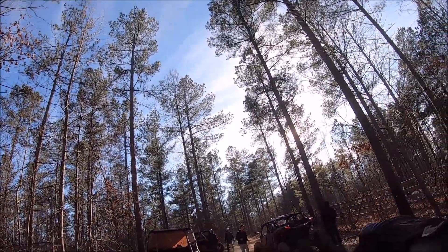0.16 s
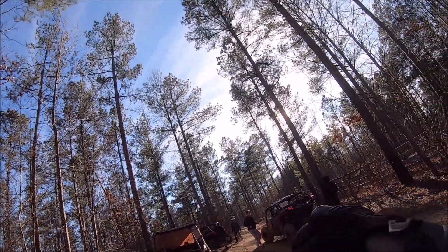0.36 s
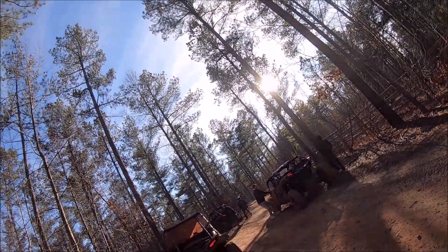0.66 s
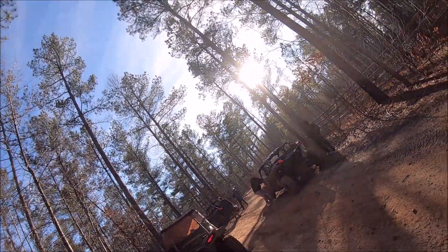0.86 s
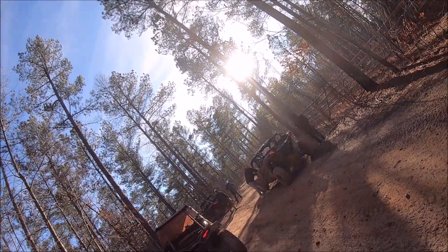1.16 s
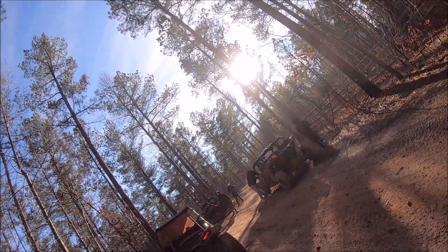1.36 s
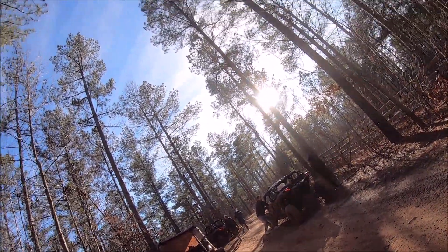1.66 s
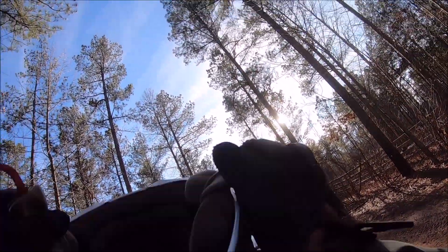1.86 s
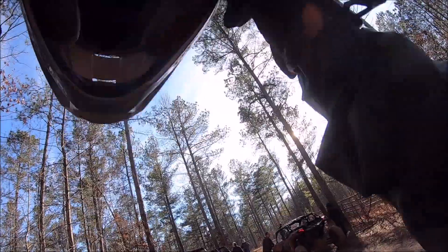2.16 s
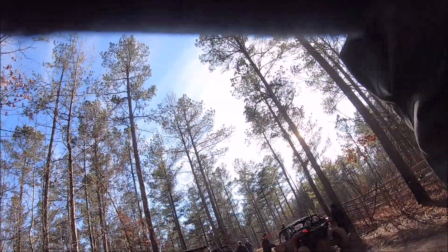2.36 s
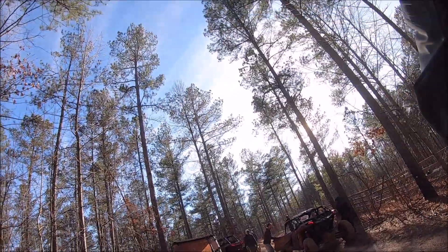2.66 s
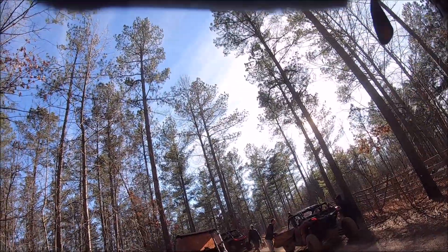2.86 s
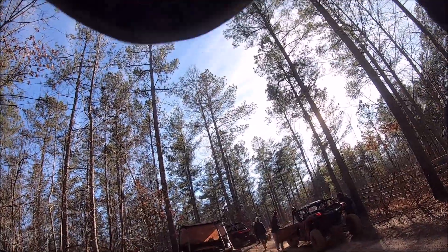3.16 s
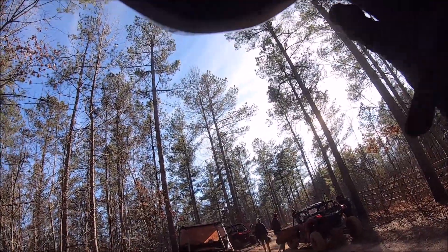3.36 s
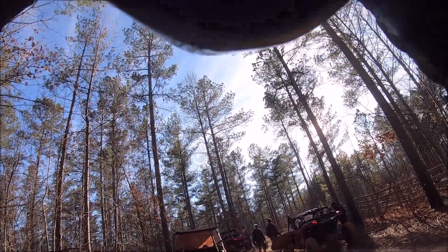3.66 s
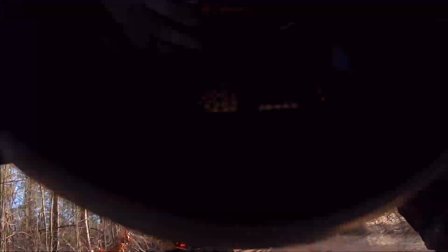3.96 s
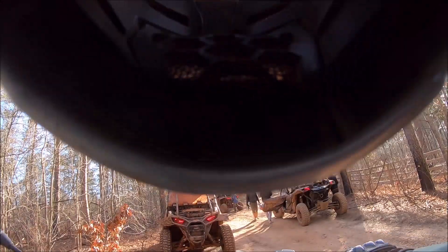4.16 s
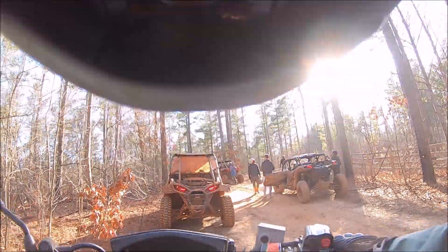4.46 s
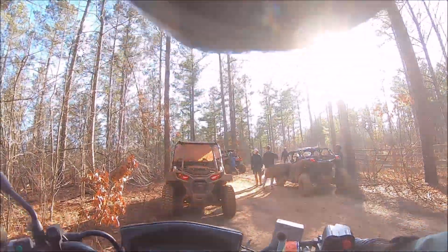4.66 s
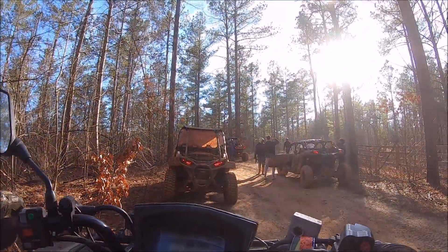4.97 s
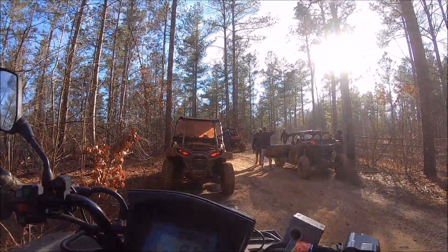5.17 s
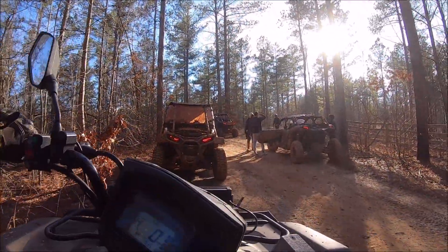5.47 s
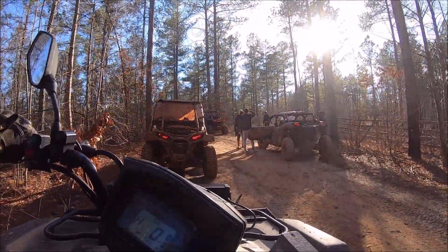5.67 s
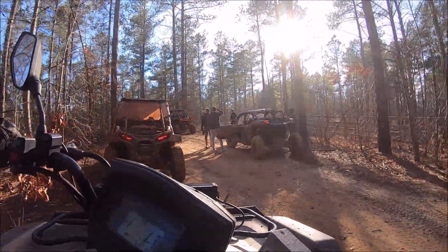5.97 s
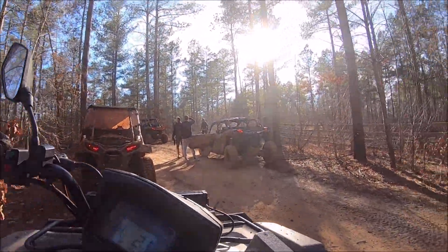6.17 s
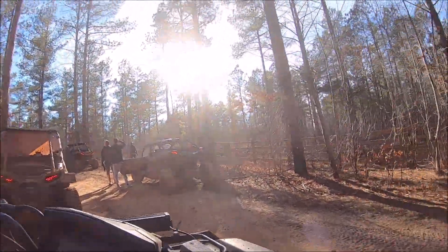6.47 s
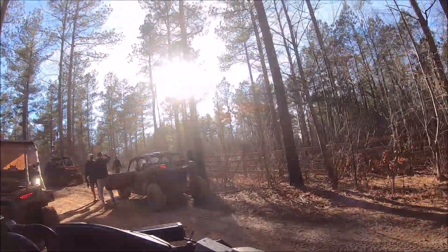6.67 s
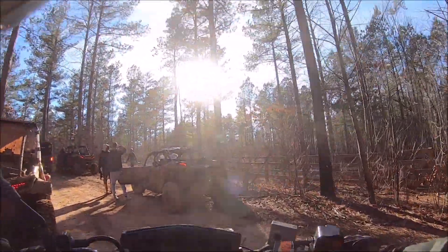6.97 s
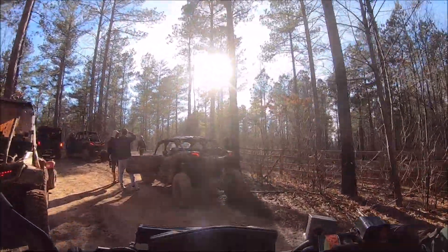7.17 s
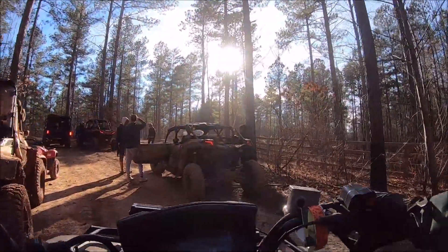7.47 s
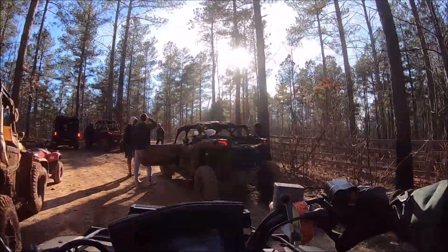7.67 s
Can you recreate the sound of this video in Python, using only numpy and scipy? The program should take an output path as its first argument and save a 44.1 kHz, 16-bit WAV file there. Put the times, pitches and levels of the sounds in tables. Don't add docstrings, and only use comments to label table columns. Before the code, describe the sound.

Outdoors among trees, an uneven idle throbs low beneath dry rubbing, hollow plastic ticks and muffled bumps, all right at the microphone. A loud buckle strike on the camera housing makes the sound suddenly shrink to near quiet, with faint distant bird notes. A popping, droning engine rises, slows and picks up again as cloth brushes by; wide stereo narrows to mono.

```python
import sys
import numpy as np
from scipy import signal
from scipy.fft import irfft
from scipy.io import wavfile
from scipy.ndimage import uniform_filter1d

SR = 44100
rng = np.random.default_rng(int(sys.argv[2]) if len(sys.argv) > 2 else 0)


def ratio(d):
    e = np.asarray(d, float) / 20
    return 10 ** e


def store_wav(level_fs):
    pcm = np.round(np.clip(np.atleast_2d(level_fs), -1, 1) * 32767)
    wavfile.write(sys.argv[1], SR, pcm.T.astype(np.int16))


N = 344406


def evened(x):
    return x / np.sqrt(np.mean(x ** 2) + 1e-20)


def read(points, hz):
    f, value = np.transpose(points)
    return np.interp(np.log(hz + 1), np.log(f + 1), value)


def play(rows):
    s, *columns = np.transpose(rows)
    return [np.interp(np.arange(N) / SR, s, c) for c in columns]


def gate(t0, t1, fade=.03):
    t = np.arange(N) / SR
    return np.clip(np.minimum(t - t0, t1 - t) / fade + 1, 0, 1)


def add(mix, s, sound):
    part = mix[round(s * SR):][:len(sound)]
    part += sound[:len(part)]


def coloured(x, points, peaks=()):
    hz = abs(np.fft.fftfreq(8192, 1 / SR))
    bumps_db = sum(g / (1 + (2 * (hz - f) / w) ** 2) for f, w, g in peaks)
    db = read(points, hz) + bumps_db
    log_gain = np.log(ratio(np.maximum(db, -100)))
    taps = np.fft.ifft(np.exp(np.conj(signal.hilbert(log_gain)))).real[:4096]
    return evened(signal.oaconvolve(x, taps)[:N])


def ring(modes):
    t = np.arange(SR // 2) / SR
    return sum(ratio(db - 60 * t / t60) * np.sin(2 * np.pi * hz * t) for hz, db, t60 in modes)


def drift(span_s):
    size = max(int(span_s * SR), 1)
    return evened(uniform_filter1d(uniform_filter1d(rng.standard_normal(N), size), size))


def firings(turns, uneven_db):
    count = np.floor(turns)
    strength = ratio(uneven_db * rng.standard_normal(256))[count.astype(int) % 256]
    return np.diff(count, prepend=count[0]) * strength


def scratch(per_s, spread_db, smooth, flicker_db):
    slips = rng.random(N) < per_s / SR
    size = ratio(spread_db * np.minimum(rng.exponential(1, N), 5)) * slips
    grains = signal.lfilter([1], [1, -.97], size) * rng.standard_normal(N)
    hiss = evened(grains) + smooth * rng.standard_normal(N)
    return hiss * ratio(flicker_db * drift(0.011))


# start_s, level_db, clear_firing_share (0-1)
THROB_CURVE = [
    [(0.0, -33.5, 0), (0.36, -28.5, 0), (0.55, -33, 0.1), (0.8, -25.5, 0.85), (0.91, -29.5, 0.7),
     (0.95, -28, 0.55), (1.35, -33.5, 0.1), (1.58, -27.5, 0.9), (2.04, -31, 0.15), (2.1, -27.5, 0.3),
     (2.17, -34, 0.4), (2.29, -25.5, 0.23), (2.82, -31.5, 0.23), (2.98, -27.5, 0.95), (3.03, -40.5, 0.5),
     (3.17, -24, 0.54), (3.21, -28, 0.03), (3.61, -30, 0.22), (3.68, -22.5, 0.3), (3.73, -32.5, 0.3),
     (3.91, -26, 0.4)],
    [(3.95, -46, 0.6), (3.99, -53, 0.7), (4.1, -41.5, 0), (4.15, -38.5, 0.3), (4.2, -47, 0.55),
     (4.6, -49, 0.36), (4.66, -40, 0.33), (4.73, -46, 0.3), (5.08, -37.5, 0.84), (5.1, -41.5, 0.7),
     (5.25, -32.5, 0.3), (6.06, -30.5, 0.24), (6.15, -33, 0.56), (6.38, -22.5, 0.1), (6.64, -25.5, 0.23),
     (6.99, -21, 0.5), (7.07, -18, 0.5), (7.11, -27, 0.6), (7.13, -24.5, 0.5), (7.75, -23.5, 0.65),
     (7.81, -26, 1)],
]
# freq_hz, level_db (per Hz)
DISTANT_WASH = [(12, -48.5), (20, -20.5), (34, -10.5), (97, -3.5), (112, -2), (135, -9.5), (229, -18),
                (273, -22), (310, -26.5), (484, -40.5), (900, -60.5), (1170, -70.5), (1980, -120)]
# start_s, firings_so_far
IDLE_FIRINGS = [(0, -.1), (.775, 9), (1.705, 20), (2.455, 29), (2.875, 34), (3.13, 37), (3.8, 45),
                (4.3, 51), (4.87, 57), (5.127, 60), (7.5, 85), (7.81, 88.2)]
# freq_hz, level_db, t60_s
MUFFLER_MODES = [(96, 0, .15), (52, -9, .15), (120, -5, .11), (190, -15, .08), (330, -17, .07)]


def idle():
    level_db, clear = play(sum(THROB_CURVE, []))
    clear = np.clip(clear, 0, 1)
    turns = play(IDLE_FIRINGS)[0] + .025 * drift(.08)
    swell = np.minimum(np.arange(SR // 2) / 700, 1)
    muffler = ring(MUFFLER_MODES) * swell
    puffs = evened(signal.oaconvolve(firings(turns, 3.0), muffler)[:N])
    wash = coloured(rng.standard_normal(N) * ratio(0.5 * drift(0.015)), DISTANT_WASH)
    return ratio(level_db) * (np.sqrt(clear) * puffs + np.sqrt(1 - clear) * wash)


# start_s, rub_db, treble_db (relative), thud_db (relative)
GLOVE_STROKES = [
    [(0.0, -46, -15, 25), (0.02, -56.5, -13.5, -9), (0.19, -35, -29, -4.5), (0.37, -35, -24, -1),
     (0.54, -38, -23, 2.5), (0.64, -34, -25.5, 0.5), (0.89, -42, -24.5, -3), (0.94, -36, -25.5, -4),
     (1.12, -35, -26.5, -11), (1.38, -50, -23, -1.5), (1.76, -33, -24.5, -1), (2.04, -41.5, -16.5, -7.5),
     (2.12, -39, -17.5, -1), (2.13, -34, -23, 6), (2.14, -33.5, -23.5, 0), (2.6, -39, -18, -12),
     (2.68, -36, -19, 1.5), (2.76, -48.5, -17.5, 0), (3.15, -39, -21.5, 0.5), (3.2, -34.5, -22, -11),
     (3.23, -34.5, -19.5, -6), (3.31, -29.5, -27, -7), (3.36, -42, -17, -6), (3.5, -34, -26.5, 3),
     (3.52, -44.5, -15, -1), (3.68, -39, -20.5, -9), (3.84, -43.5, -16, -3.5), (3.87, -32.5, -25, -15.5),
     (3.9, -29, -16, 4)],
    [(3.96, -75, -18, -15.5), (4.422, -55.5, -24, -12), (4.428, -58, -23, 3.5), (4.744, -57.5, -17.5, -1),
     (4.858, -50.5, -25, -7), (4.984, -55.5, -19, 3), (4.996, -48.5, -1, -11.5), (5.016, -59, -20, -3),
     (5.078, -69, -7, -6), (5.098, -57, -35, -20), (5.2, -60, -7, -9.5)],
    [(6.2, -51, -14, -21), (6.532, -31.5, -38, -2.5), (6.756, -43.5, -20, 9.5), (6.86, -38.5, -29, -9),
     (7.054, -35, -26, -5.5), (7.128, -43, -26, 0), (7.156, -38, -13, 18), (7.164, -38.5, -28, -3),
     (7.2, -43.5, -13, -15), (7.28, -36.5, -22, -40)],
]
# freq_hz, level_db (per Hz)
GLOVE_COLOUR = [(240, -31), (400, -9.5), (586, -7), (653, -11.5), (761, -4.5), (1150, 1.5), (1490, -5.5),
                (1880, -1.5), (2090, -10), (3300, -17.5), (3970, -27.5), (7210, -43), (9070, -39),
                (12700, -58.5), (15500, -55.5)]
# freq_hz, width_hz, gain_db
HOUSING_PEAKS = [(608, 39, 6.5), (1150, 730, 1.5), (1910, 50, 1), (2250, 190, 4), (2754, 200, 4.5),
                 (3264, 77, 4.5), (8770, 1200, -3)]


def gloves():
    level_db, treble_db, thud_db = play(sum(GLOVE_STROKES, []))
    rub = coloured(scratch(1500, 2.7, 1.0, 1.0), GLOVE_COLOUR, HOUSING_PEAKS)
    treble = signal.butter(4, 3900, "high", fs=SR, output="sos")
    fizz = signal.sosfiltfilt(treble, rub, padtype="even")
    thud_colour = [(60, -38), (140, 3.5), (230, 5), (330, -3.5), (500, -18), (900, -61)]  # freq_hz, level_db
    thud = coloured(scratch(300, 3.0, 0.72, 1.96), thud_colour)
    mix = rub - fizz + ratio(treble_db) * evened(fizz) + ratio(thud_db) * thud
    touching = gate(0, 5.2, 0.11) + 0.54 * gate(6.3, 7.3, 0.12) + 0.49 * gate(5.1, 8, 0.24)
    return ratio(level_db) * mix * touching


# start_s, peak_db, pitch_hz
MOUNT_BUMPS = [(0.24, -17.5, 123), (1.22, -18.5, 94), (1.782, -23.5, 86.1), (3.169, -19.5, 126),
               (3.299, -23, 143), (3.67, -11.5, 82.6), (3.902, -18, 61), (4.034, -33, 72.7),
               (6.684, -13.5, 102), (7.048, -13, 117), (7.156, -18.5, 83.4)]


def bumps():
    out, t = np.zeros(N), np.arange(8192) / SR
    sinking_t = t + 0.0043 * (1 - np.exp(-t / 0.0031))
    for s, db, hz in MOUNT_BUMPS:
        decay = ratio(db - 60 * t * hz / 9)
        onset = np.minimum(t * hz / 0.19, 1)
        add(out, s, decay * np.sin(2 * np.pi * hz * sinking_t) * onset)
    return out


# start_s, peak_db, ring_hz, treble_db (relative), hollow_db (relative)
PLASTIC_TAPS = [(0.607, -22, 1270, -32, -22), (1.063, -34, 1280, -28, -19), (1.204, -29, 1260, -32, -10),
                (1.747, -20, 920, -34, -21), (2.128, -18.5, 1910, -37, -28), (2.144, -17, 1190, -40, -11),
                (2.155, -18, 1110, -46, -8.5), (2.172, -22, 1200, -53, -22), (2.203, -28, 1920, -41, -19),
                (2.238, -21, 1190, -49, -17), (2.267, -22, 1940, -34, -11), (2.293, -23, 1840, -32, -17),
                (2.301, -22.5, 1920, -35, -18), (2.489, -25, 1670, -30, -6), (2.617, -26.5, 1330, -31, -12),
                (3.049, -29, 1250, -32, -19), (3.165, -20, 1170, -31, -25), (3.196, -17, 1100, -38, -18),
                (3.293, -26, 1780, -20, -6), (3.428, -23, 1110, -30, -19), (3.862, -19, 1880, -28, -16),
                (3.866, -20.5, 1060, -22, -9.5), (3.898, -19.5, 1750, -42, -19),
                (4.84, -35, 1180, -32, -23), (4.994, -33.5, 1510, -27, -22), (5.195, -36, 1380, -17, 2),
                (5.306, -45, 1600, -23, -13), (6.688, -19, 1230, -14.5, -6), (7.141, -19.5, 902, -44, -10),
                (7.152, -9.5, 1150, -44, 0)]


def taps():
    out, t = np.zeros(N), np.arange(2048) / SR
    crack_band = signal.butter(2, [3500, 9000], "band", fs=SR)
    for s, db, hz, treble_db, hollow_db in PLASTIC_TAPS:
        body = np.sin(2 * np.pi * hz * t) + 0.23 * np.sin(2 * np.pi * 1.62 * hz * t)
        body *= ratio(-60 * t / 0.015)
        hollow = ratio(hollow_db + 5.5 - 60 * t / 0.0069) * np.sin(2 * np.pi * 420 * t)
        crack = signal.lfilter(*crack_band, rng.standard_normal(len(t)))
        crack *= ratio(treble_db + 6 - 60 * t / 0.0049)
        onset = np.minimum(t / 0.00069, 1)
        add(out, s, ratio(db + 2) * (body + hollow + crack) * onset)
    return out


# start_s, level_db, freq_hz, t60_s
HOUSING_SHAKES = [
    (3.877, -13, 700, .015),
    (3.885, -4.5, 656, .018),
    (3.8965, -2, 620, 0.025),
    (3.9073, -2, 870, 0.0074),
]


def shakes():
    out = np.zeros(N)
    onset = np.minimum(np.arange(SR // 2) / 40, 1)
    for s, db, hz, t60 in HOUSING_SHAKES:
        add(out, s, ring([(hz, db, t60)]) * onset)
    return out


# start_s, freq_hz, level_db, t60_s
LOOSE_PINGS = [
    (3.9077, 1760, -8, 0.012),
    (4.039, 332, -36.5, 0.016),
    (6.687, 5370, -33.5, 0.017),
    (6.688, 4530, -30, 0.013),
]


def pings():
    out = np.zeros(N)
    for s, *mode in LOOSE_PINGS:
        add(out, s, ring([mode]))
    return out


# freq_hz, level_db (per Hz)
CLACK_COLOUR = [(180, -39), (300, -7), (1140, -5.5), (1870, 2), (2930, -7.5), (3690, -23.5), (5050, -13.5),
                (7620, -40.5), (9140, -34.5), (15500, -41.5)]
# freq_hz, level_db, t60_s
BUCKLE_MODES = [(1820, -63, 1), (3580, -72.5, 0.99), (2320, -76, .6), (6800, -84, .9), (7752, -83, .8)]


def buckle():
    out, t = np.zeros(N), np.arange(2048) / SR
    strike_s, clack_db, clack_t60_s = 3.909, -19, .008
    blow = rng.standard_normal(len(t)) * ratio(-60 * t / clack_t60_s)
    add(out, strike_s - .0012, ratio(clack_db - 12.5) * coloured(blow, CLACK_COLOUR))
    add(out, strike_s, ring(BUCKLE_MODES))
    return out


# start_s, length_s, first_hz, last_hz, level_db
BIRD_NOTES = [
    (4.7, .045, 5600, 6450, -72),
    (4.774, 0.11, 8800, 8300, -84),
    (4.89, .065, 6350, 5600, -73),
]


def bird():
    out = np.zeros(N)
    for s, length_s, first_hz, last_hz, db in BIRD_NOTES:
        u = np.linspace(0, 1, int(length_s * SR))
        cycles = np.cumsum(first_hz + (last_hz - first_hz) * u) / SR
        add(out, s, ratio(db) * np.sqrt(np.sin(np.pi * u)) * np.sin(2 * np.pi * cycles))
    return out


# start_s, firings_so_far
REV_FIRINGS = [(5, -.3), (5.225, 4), (5.328, 6), (5.417, 8), (5.509, 10), (5.631, 13), (5.791, 17),
               (5.987, 22), (6.186, 27), (6.346, 31), (6.51, 35), (6.679, 39), (6.808, 42), (6.946, 45),
               (7.05, 47), (7.175, 49), (7.3, 51), (7.411, 53), (7.517, 55), (7.728, 59), (7.94, 63)]
# start_s, pop_db, drone_db, valve_hiss_db, pop_sharpness_db (per order)
REV_LOAD = [(5.0, -53, -51, -66, -.5), (5.17, -48.5, -38, -55.5, -0.05), (5.3, -43.5, -38, -48.5, 0.14),
            (5.5, -36, -33.5, -43, 0.05), (5.9, -33, -29, -41.5, -0.15), (6.3, -30.5, -31.5, -40.5, -0.11),
            (6.6, -33.5, -27, -38.5, -0.06), (6.85, -36.5, -29.5, -44, -.6), (7.15, -38, -34, -49.5, -1.5),
            (7.4, -34, -28, -50, -0.8), (7.81, -33.5, -25, -54, -0.13)]
# multiple_of_firing_rate, level_db
EXHAUST_ORDERS = [(1, 7), (2, -1.5), (3, -8.5), (4, -15.5), (5, 0.5), (6, -20), (7, -18.5), (8, -24),
                  (9, -15), (10, -11), (11, -12), (12, -11), (13, -19.5), (14, -21.5), (15, -19.5),
                  (16, -13), (17, -21), (18, -23), (19, -20), (20, -20), (21, -20), (22, -31.5), (23, -27),
                  (24, -55.5), (25, -33), (26, -29.5)]
# freq_hz, level_db (per Hz)
VALVE_COLOUR = [(350, -18.5), (600, -6.5), (820, -8), (1690, -3.5), (1990, -17), (2250, -14.5), (2470, -18),
                (2950, -7.5), (3290, -22), (4430, -22), (10600, -46.5), (15500, -49)]
# freq_hz, width_hz, gain_db
CASING_PEAKS = [(1670, 127, 8), (2280, 61, 15.5), (2908, 35, 11.5), (3560, 220, 12), (4530, 290, 12),
                (5700, 87, 1), (6670, 60, 11.5), (7440, 92, 6), (8050, 110, 11)]


def revving():
    pop_db, drone_db, hiss_db, tilt_db = play(REV_LOAD)
    speed = np.gradient(play(REV_FIRINGS)[0]) * SR
    speed = uniform_filter1d(uniform_filter1d(speed, 3500), 3500)
    turns = REV_FIRINGS[0][1] + np.cumsum(speed) / SR
    unsteady = turns + .0025 * drift(.03)

    pops = np.zeros(N)
    for k, db in EXHAUST_ORDERS[6:]:
        pops += ratio(db + tilt_db * (k - 11)) * np.sin(2 * np.pi * round(k) * unsteady)
    drone = np.zeros(N)
    for k, db in EXHAUST_ORDERS[1:6]:
        boom_db = 9 / (1 + ((k * speed - 113) / 12) ** 2)
        phase = 2 * np.pi * round(k) * (unsteady + 0.1125 * k)
        drone += ratio(db + boom_db - 7) * np.cos(phase)

    puff = 0.8 + 0.71 * np.exp(-((turns + .1) % 1) / 0.44)
    air = scratch(3000, 1.7, 1.25, 1.0) * puff
    facing = gate(5.6, 6.4, 1.0)
    hiss = facing * coloured(air, VALVE_COLOUR, CASING_PEAKS)
    hiss += (1 - facing) * coloured(air, VALVE_COLOUR)

    pops *= ratio(pop_db + 7 + .8 * drift(.03))
    drone *= ratio(drone_db + 4 + drift(.06))
    return gate(5, 8, .1) * (pops + drone + ratio(hiss_db) * hiss)


# start_s, level_db
SLEEVE_BRUSH = [
    (7.26, -35.5),
    (7.374, -27),
    (7.502, -32),
    (7.538, -42),
    (7.686, -31.5),
    (7.788, -38.5),
    (7.81, -44),
]
# freq_hz, level_db (per Hz)
CLOTH_COLOUR = [(290, -41), (500, -14), (769, -18), (1450, 3), (2070, -1), (2540, 3), (3060, -6.5),
                (3330, -5.5), (3850, -17), (4840, -15.5), (5920, -30), (12100, -39), (15500, -62)]
# freq_hz, width_hz, gain_db
FOLD_PEAKS = [(1500, 390, 0.5), (1780, 95, 4.5), (2440, 40, 8.5), (3250, 63, 9.5), (4720, 140, 6)]


def sleeve():
    drag = coloured(scratch(2600, 1.9, 0.99, 2.1), CLOTH_COLOUR, FOLD_PEAKS)
    return ratio(play(SLEEVE_BRUSH)[0]) * gate(7.305, 8, 0.023) * drag


def scene():
    handling = gloves() + bumps() + taps() + pings() + buckle() + sleeve()
    mix = idle() + handling + bird() + revving()
    shake = shakes()
    return np.array([mix + shake, mix - shake])


# freq_hz, level_db
PORT_LEVEL = [(60, -14.5), (92, -7), (140, -20.5), (210, -12), (330, -8), (500, 5.5), (770, 16.5),
              (1170, -1), (1790, 0), (2740, 3), (4190, 2), (6410, 8), (9810, -1), (15000, 0)]
# freq_hz, turn_rad
PORT_PHASE = [(20, 3.1), (350, 1.74), (700, 1.47), (1200, 2.86), (1900, 2.1), (3000, 1.87), (15000, 2.06)]
# start_s, level_db
STEREO_WIDTH = [(0, -4.5), (4.92, -4.5), (5.1, -12), (5.25, -22), (5.5, -27), (5.8, -51), (7.81, -60)]


def port_difference(mid):
    hz = np.fft.rfftfreq(4096, 1 / SR)
    scatter = 7.2 * uniform_filter1d(rng.standard_normal(len(hz)), 30) * np.clip(hz / 1500, 0, 1)
    band_hz, s, z = signal.stft(mid, SR, nperseg=256)
    a, b = rng.standard_normal((len(s), len(band_hz), 2)).T
    spread = 0.71 * np.clip(band_hz / 3000, 0, 2)[:, None] ** .5
    z = z * (1 + spread * (a + 1j * b))
    z[:2] *= np.clip((5.25 - s) / 0.16, 0, 1)
    arriving = signal.istft(z, SR, nperseg=256)[1][:N]
    turn = np.exp(1j * (read(PORT_PHASE, hz) + scatter))
    response = np.roll(irfft(ratio(read(PORT_LEVEL, hz)) * turn), 2048)
    side = signal.oaconvolve(arriving, response * np.hanning(4096))[2048:N + 2048]
    return side * ratio(play(STEREO_WIDTH)[0])


def low_pass(x):
    return signal.sosfilt(signal.butter(12, 16790, fs=SR, output="sos"), x)


def record(dry):
    low_cut = signal.butter(2, 28, "high", fs=SR, output="sos")
    high_cut = signal.butter(8, 14900, fs=SR, output="sos")
    mid = signal.sosfilt(low_cut, dry.mean(0))
    mid = signal.sosfiltfilt(high_cut, mid, padtype="even")
    side = port_difference(mid) + (dry[0] - dry[1]) / 2
    ports = np.clip([mid + side, mid - side], -.98, .98) * gate(0, N / SR - .006, .006)
    return low_pass(ports)


dry = scene()
out = record(dry)
store_wav(out)
```